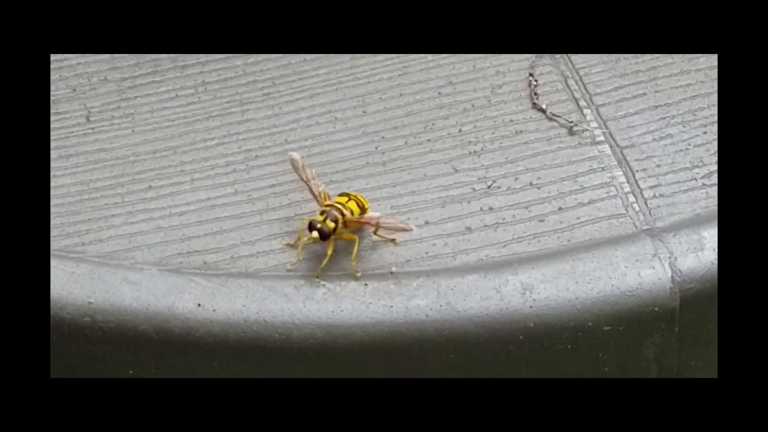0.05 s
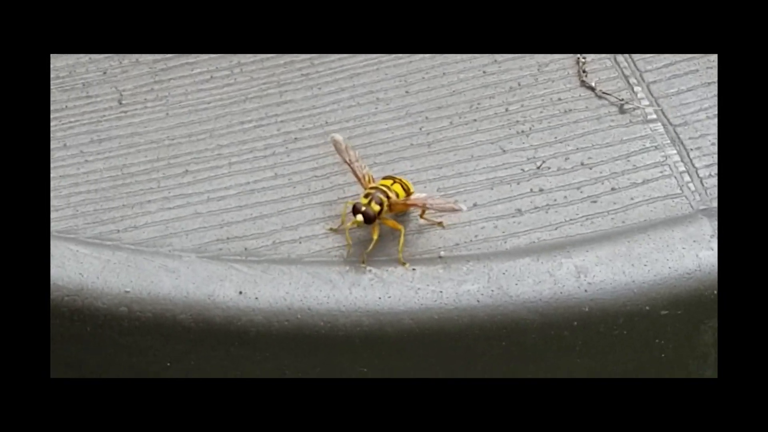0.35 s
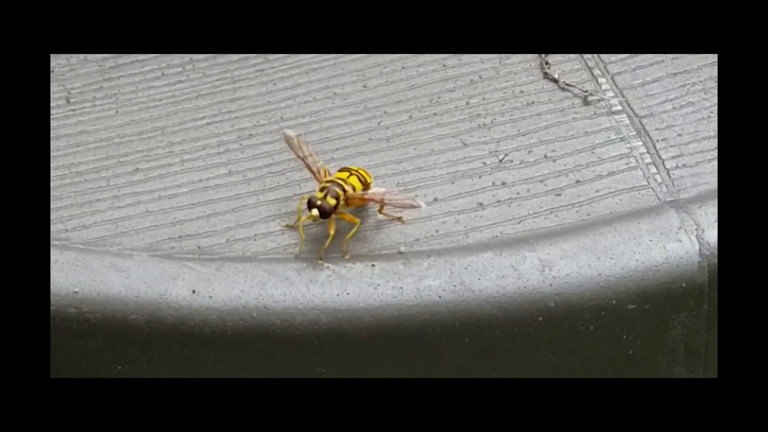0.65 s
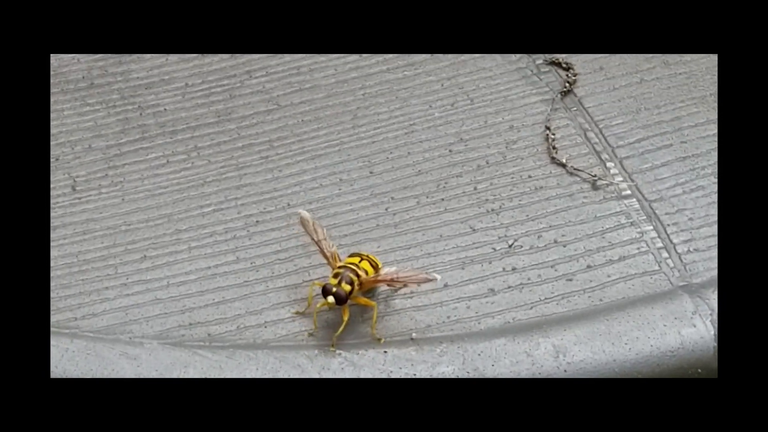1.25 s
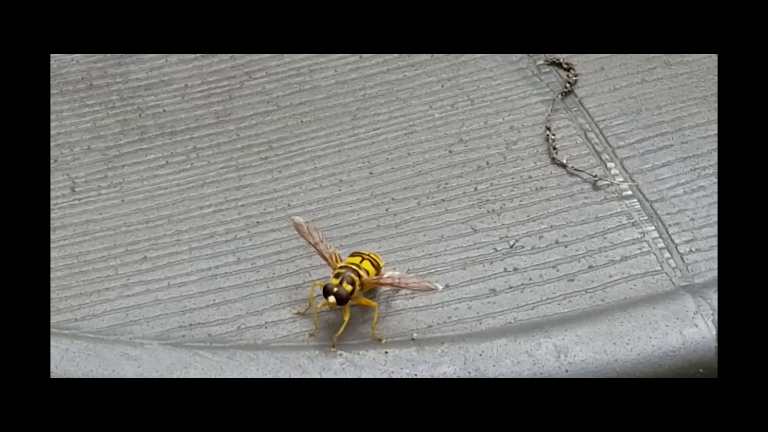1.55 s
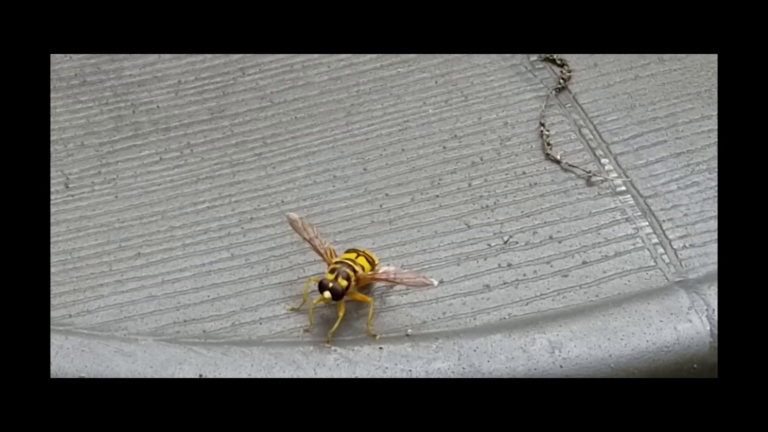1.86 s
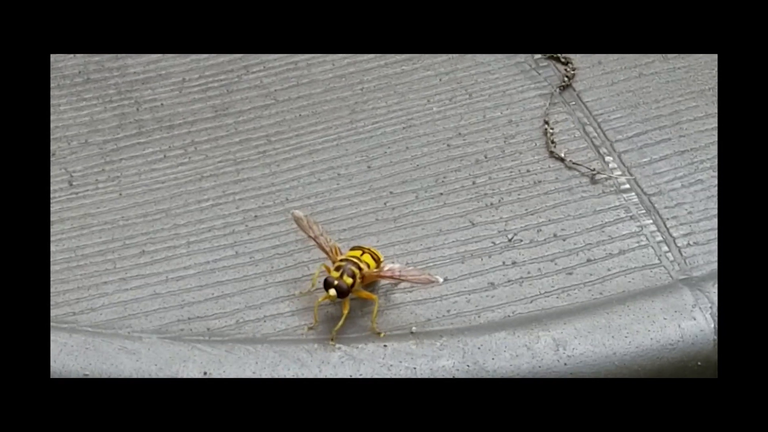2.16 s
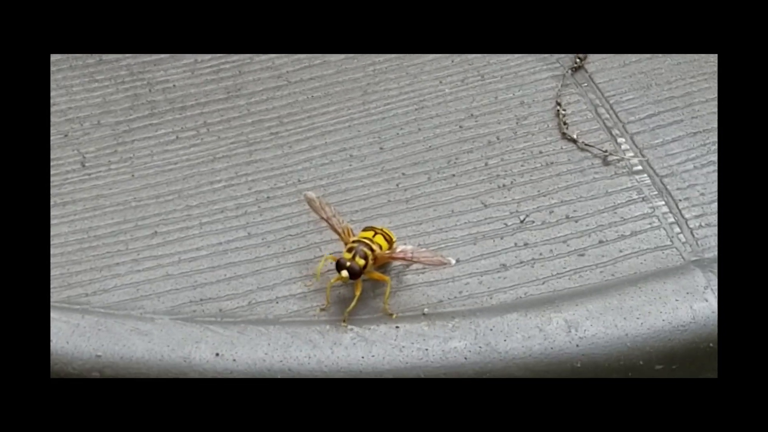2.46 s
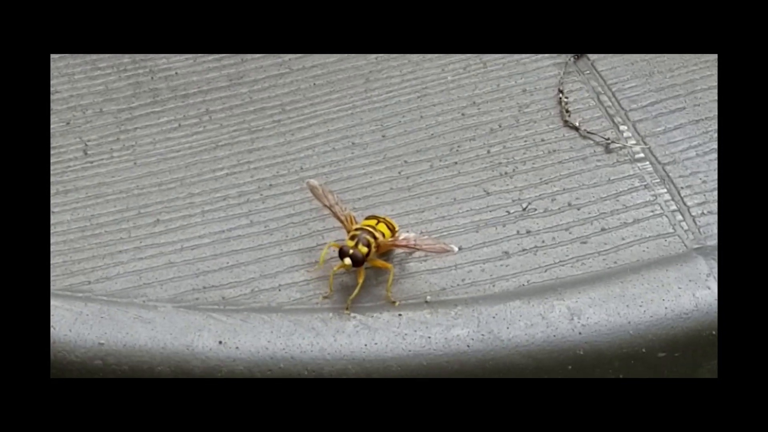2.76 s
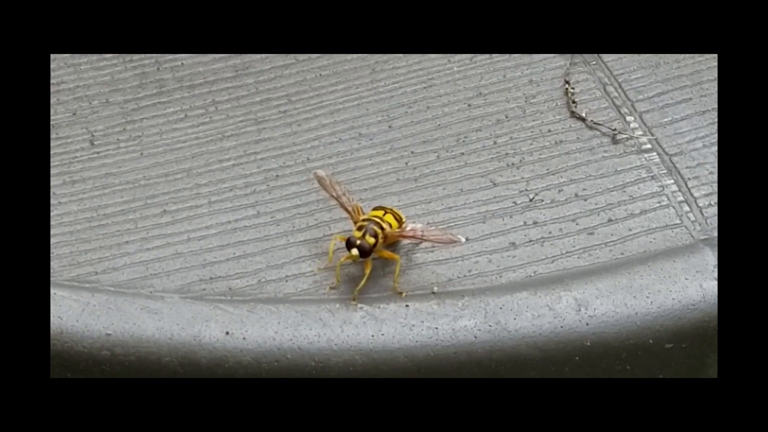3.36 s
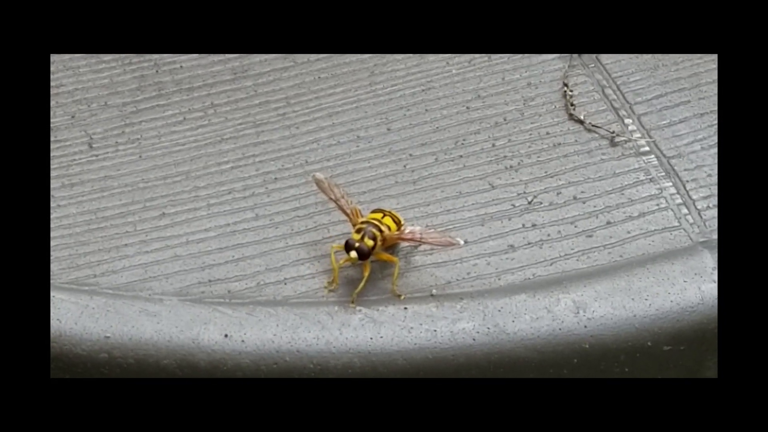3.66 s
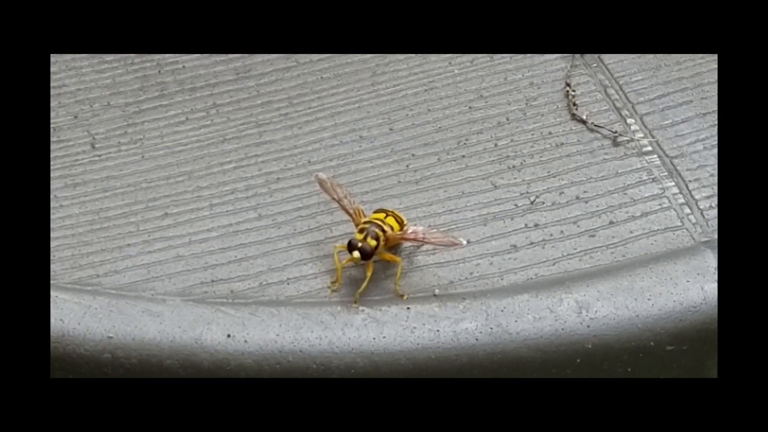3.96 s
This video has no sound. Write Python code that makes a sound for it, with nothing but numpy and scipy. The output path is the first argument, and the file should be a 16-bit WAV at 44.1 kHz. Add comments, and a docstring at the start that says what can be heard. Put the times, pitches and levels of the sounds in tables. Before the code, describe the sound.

A distant engine hums low and faint throughout, over quiet outdoor rumble and steady hiss. A quick run of tiny, sharp clicks sounds close to the microphone in the first 0.2 seconds. Soft bumps and light hand rubs follow from 0.5 to 1 second, ending with a faint tick. The hum swells around 2 seconds, with another tick, fades near 3.5, and returns with a brief rub near 4.

```python
"""A distant engine hums near 91 Hz, swelling and fading over the low rumble of a quiet spot outdoors.
It is heard through the two microphones of a hand-held camera, close to a perched, silent insect.
Each microphone adds its own hiss with a narrow peak. The camera gives a quick run of tiny clicks,
then a few soft bumps, mostly on one microphone at a time, and light rubs of the hand on its case."""
import sys
import numpy as np
from scipy import signal
from scipy.fft import rfft, irfft
from scipy.io import wavfile

SR = 44100
rng = np.random.default_rng(int(sys.argv[2]) if len(sys.argv) > 2 else 0)


def log_audio(samples):
    """Write samples as a 16-bit WAV file to the path given in sys.argv[1]."""
    # one column per channel
    frames = np.atleast_2d(samples).T
    # limit to full scale, then quantise
    limited = np.clip(frames, -1, 1)
    pcm = np.round(limited * 32767).astype(np.int16)
    wavfile.write(sys.argv[1], SR, pcm)


N = 176400


def amp(db):
    """Decibels to gain."""
    return 10 ** (np.asarray(db) / 20)


def unit(x):
    """Scales to rms 1."""
    return x / np.sqrt(np.mean(x ** 2) + 1e-20)


def read(points, hz, column=1):
    """Reads a column of a spectrum on a log-frequency axis."""
    table = np.transpose(points)
    return np.interp(np.log(hz + 1), np.log(table[0] + 1), table[column])


def curve(points):
    """Joins (seconds, value) points by straight lines."""
    return np.interp(np.arange(N) / SR, *np.transpose(points))


def pan(db):
    """Microphone gains that put the left db above the right."""
    return amp([[db / 2], [-db / 2]])


def add(mix, start, sound):
    """Mixes a sound in at a start in seconds."""
    part = mix[:, max(round(start * SR), 0):][:, :sound.shape[-1]]
    part += sound[..., :part.shape[1]]


def noise(shape, size):
    """Two unrelated channels of noise with the spectrum shape(Hz), scaled to rms 1."""
    white = rfft(rng.standard_normal((2, size)))
    return unit(irfft(white * shape(np.fft.rfftfreq(size, 1 / SR)), size))


def resonance(hz, centre, width):
    """Gain of a peak that falls to half at the edges of its width in Hz."""
    return 1 / (1 + (2 * (hz - centre) / width) ** 2)


def rumble():
    """Far-off outdoor noise, its low end nearly the same at both microphones."""
    # The rumble's spectrum. Each row: frequency in Hz, relative level in dB.
    spectrum = [(12, -13), (25, -21.5), (48, -1), (80, -2.5), (120, 1), (155, -11.5), (230, -11.5),
                (330, -16.5), (430, -24.5), (600, -26.5), (800, -33.5), (1300, -36.5), (3000, -60)]
    # Its slow rise and fall. Each row: time in seconds, level in dB.
    levels = [(0, -49.5), (.8, -50.5), (1.4, -51.5), (2.1, -50.5), (2.8, -50), (3.3, -52.5), (3.6, -53.5),
              (3.9, -52), (4, -49.5)]
    # How alike the microphones hear it. Each row: frequency in Hz, correlation from 0 to 1.
    likeness = [(30, 0.72), (60, 0.85), (140, 0.88), (330, 0.73), (700, 0.54), (1500, 0.071)]
    hz = np.fft.rfftfreq(N, 1 / SR)
    left, unrelated = rfft(rng.standard_normal((2, N))) * amp(read(spectrum, hz))
    same = read(likeness, hz)
    right = same * left + np.sqrt(1 - same ** 2) * unrelated
    return unit(irfft(np.array([left, right]), N)) * amp(curve(levels)) * pan(db=1)


def microphone_hiss():
    """Each microphone's own steady hiss, with a narrow peak that shimmers slightly."""
    # The broad hiss. Each row: frequency in Hz, relative level in dB on the left, then on the right.
    spectrum = [(300, -11.5, 0.5), (1354, -6.5, -8.5), (1995, -4, 3.5), (2290, -5.5, 2), (2970, 0, 0),
                (3900, 1, 4.5), (5430, 3, -4), (6470, -1.5, -3.5), (7400, 1.5, -6), (8340, -1.5, 1),
                (9030, -3.5, -10), (10400, -5.5, -8), (12300, -6, -3.5), (13900, -10.5, -6),
                (13850, -10, -22), (13900, -47, -68)]
    # The narrow peak, left microphone first. Each row: centre in Hz, width in Hz, level in dB.
    peaks = [(4480, 470, -56), (4443, 445, -53)]
    broad = noise(lambda hz: amp([read(spectrum, hz, column=1), read(spectrum, hz, column=2)]), N)
    centre, width, peak_db = np.transpose(peaks)[:, :, None]
    peak = noise(lambda hz: 1 / np.sqrt(1 + abs(2 * (hz - centre) / width) ** 5), N)
    shimmer_db = noise(lambda hz: hz * np.exp(-hz / 12.4), N)[0]  # about 1 dB, strongest near 12 Hz
    return amp(-56) * broad + amp(peak_db + shimmer_db) * peak


def hand_rubs():
    """Skin slides briefly over the camera's case: a light brush with a dull rustle under it."""
    # Each row: start in seconds, length in seconds, brush level in dB, pan in dB, rustle level in dB.
    strokes = [(.465, .058, -57.5, 10.5, -60.5), (.565, 0.093, -71, 11, -63), (.675, 0.03, -73, 0, -63),
               (.72, 0.06, -72, 5, -73), (.835, .045, -68, 2, -63), (3.945, 0.052, -56.5, -3, -75)]
    # The brush of skin. Each row: frequency in Hz, relative level in dB.
    spectrum = [(300, 10.5), (1000, -4.5), (2500, 2), (8000, 3.5), (13500, 1), (15000, -37)]
    rustle_hz, rustle_width_hz = 387, 290
    mix = np.zeros((2, N))
    for start, length, brush_db, pan_db, rustle_db in strokes:
        size = int(length * SR)
        brush = noise(lambda hz: amp(read(spectrum, hz)), SR // 4)
        rustle = noise(lambda hz: np.exp(-((hz - rustle_hz) / rustle_width_hz) ** 2), SR // 4)
        friction = amp(brush_db) * brush + amp(rustle_db) * rustle
        add(mix, start, pan(pan_db) * np.sqrt(np.hanning(size)) * friction[:, :size])
    return mix


def microphone_bumps():
    """Soft swings of pressure right at a microphone port, each a push and then a release."""
    # Each row: time of the turn in seconds, gain in dB, push and release in seconds, pan in dB.
    bumps = [(0.4765, -32.5, 0.0011, 0.0021, 28), (0.49, -34, 0.0055, 0.0068, 19),
             (0.5125, -41, .003, 0.0045, 18), (0.5718, -37, .0013, 0.0019, 25),
             (0.705, -43, 0.0059, .004, -22), (.7318, -36, 0.0043, .0045, -22),
             (.7755, -35.5, 0.0052, 0.0041, -16), (.9204, -38, 0.0031, .0032, 25),
             (0.947, -47, .003, 0.0036, 23)]
    port = signal.butter(2, [35, 690], "band", fs=SR, output="sos")  # the low cut adds a short rebound
    mix = np.zeros((2, N))
    for turn, db, push, release, pan_db in bumps:
        t = np.arange(N) / SR - turn
        progress = t / np.where(t < 0, push, release)
        swing = -progress * np.exp(-np.minimum(progress ** 2, 50))
        mix += amp(db) * pan(pan_db) * signal.sosfilt(port, swing)
    return mix


def camera_clicks():
    """Tiny hard contacts by the microphones: a snap, then a bright, damped ring over the plastic shell."""
    # Each row: start in seconds, gain in dB, ring pitch in Hz, shell level in dB, pan in dB, decay in
    # seconds, hollow note level in dB, snap level in dB. Shell, note and snap are relative to the ring.
    clicks = [(.0058, -37.5, 13300, -3.5, 0, 0.0028, -16, 2), (.0233, -44, 12500, -2.5, 4, 0.0043, -9, 1),
              (.0402, -28.5, 14900, -22, -3, .0018, -26, 10), (.0515, -49.5, 13000, 0.5, 10, 0.0038, 1, -6),
              (.0735, -39, 11500, -4, -1.5, 0.0029, -8, -6), (.0845, -50, 13000, -6, -1, 0.0019, -14, -3),
              (.1079, -37.5, 13100, -10.5, -1, .0026, -30, 2),
              (.1165, -44.5, 13300, -15, -6, .0018, -25, 1), (.1342, -44.5, 11700, -12, 1, .0017, -25, -1),
              (.9849, -48, 12100, 0, -5, 0.0011, -25, 2), (2.204, -47, 12400, -18, -5, 0.0012, -25, 4)]
    # The body of the shell. Each row: frequency in Hz, relative level in dB.
    shell_spectrum = [(400, 1), (1200, -0.5), (2000, 3), (2450, 3.5), (3000, 2), (5800, -3), (7500, 2),
                      (10000, 6), (15000, -37)]
    rise_s, tail_db, tail_stretch, note_decay_s = 0.00035, -13, 8.6, 0.0054
    snap_centre_s, snap_width_s, right_lag_s = 0.000476, 0.00022, 0.000016
    size = 4096
    t = np.arange(size) / SR
    rise = np.minimum(t / rise_s, 1)
    snap_time = np.array([t, t - right_lag_s]) - snap_centre_s
    mix = np.zeros((2, N))
    for start, db, ring_hz, shell_db, pan_db, decay, note_db, snap_db in clicks:
        top_hz = 19900 + 122 * db  # a harder click reaches higher
        rolloff = lambda hz: 1 / np.sqrt(1 + (hz / top_hz) ** 60)
        ring = noise(lambda hz: rolloff(hz) * resonance(hz, ring_hz, width=4600), size)
        shell = noise(lambda hz: rolloff(hz) * amp(read(shell_spectrum, hz)), size)
        envelope = np.exp(-t / decay) + amp(tail_db) * np.exp(-t / (decay * tail_stretch))
        body = envelope * (ring + amp(shell_db) * shell)
        note = np.exp(-t / note_decay_s) * noise(lambda hz: resonance(hz, centre=2450, width=350), size)
        snap = np.exp(-(snap_time / snap_width_s) ** 2) * np.sin(2 * np.pi * ring_hz * snap_time)
        click = rise * (amp(snap_db) * snap + body + amp(note_db) * note)
        add(mix, start, amp(db) * pan(pan_db) * click)
    return mix


def distant_engine():
    """A far engine: firing tone and octave fade in and out on the air, with a weak steady tone between."""
    # The engine's speed. Each row: time in seconds, firing rate in Hz.
    firing_rates = [(0, 91), (.4, 90.56), (1.3, 90), (2.05, 90.35), (2.5, 90.76), (3.1, 90.95), (3.5, 89.5),
                    (4, 90.2)]
    # The firing tone at the microphones. Each row: time in seconds, level in dB.
    firing_levels = [(0, -45), (.12, -42), (.35, -49), (.6, -50.5), (.9, -66), (1.08, -47.5), (1.35, -59.5),
                     (1.6, -47), (2.05, -41), (2.5, -45), (3.22, -48), (3.35, -55), (3.6, -64), (3.85, -69),
                     (3.882, -44), (3.92, -58), (4, -50)]
    # The octave above it. Each row: time in seconds, level in dB.
    octave_levels = [(0, -75), (.25, -62), (.7, -71.5), (1.2, -62), (1.6, -57), (2.1, -55), (2.55, -62.5),
                     (2.85, -60.5), (3.5, -70), (4, -59.5)]
    waver = 0.0032 * noise(lambda hz: 1 / (1 + (hz / 6) ** 2) ** 2, N)[0]
    phase = 2 * np.pi * np.cumsum(curve(firing_rates) * (1 + waver)) / SR
    firing = amp(curve(firing_levels)) * np.sin(phase)
    octave = amp(curve(octave_levels)) * np.sin(2 * phase)
    between = amp(-66.5) * np.sin(1.5 * phase)
    return np.sqrt(2) * (firing + octave + between)  # makes each level an rms level


def scene():
    """Rumble, hiss and the far engine, with the handling sounds close up."""
    background = rumble() + microphone_hiss()
    return background + distant_engine() + microphone_bumps() + camera_clicks() + hand_rubs()


def record(dry):
    """The recorder's band limit cuts the treble steeply at 15.7 kHz."""
    lowpass = signal.firwin(511, 15700, window=("kaiser", 9), fs=SR)
    return signal.oaconvolve(dry, lowpass[None], "same")


dry = scene()
out = record(dry)
log_audio(out)
```